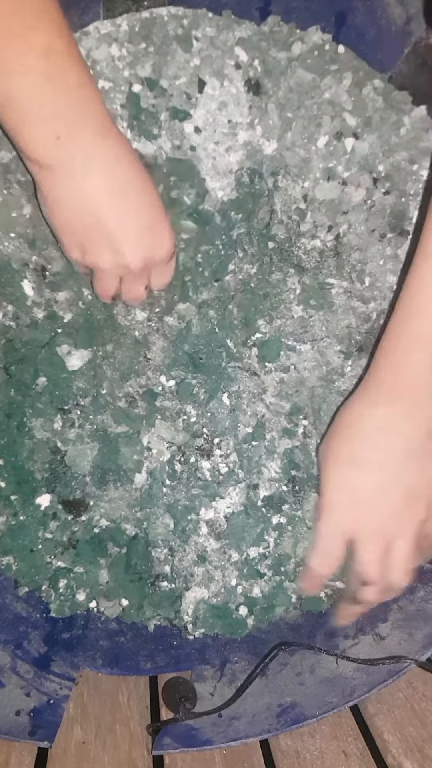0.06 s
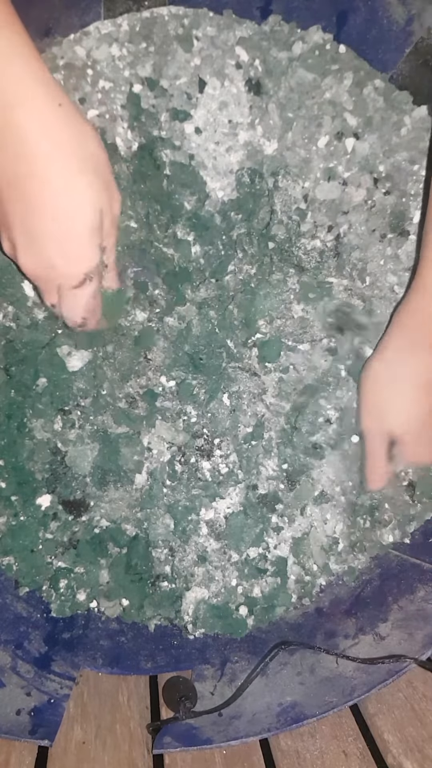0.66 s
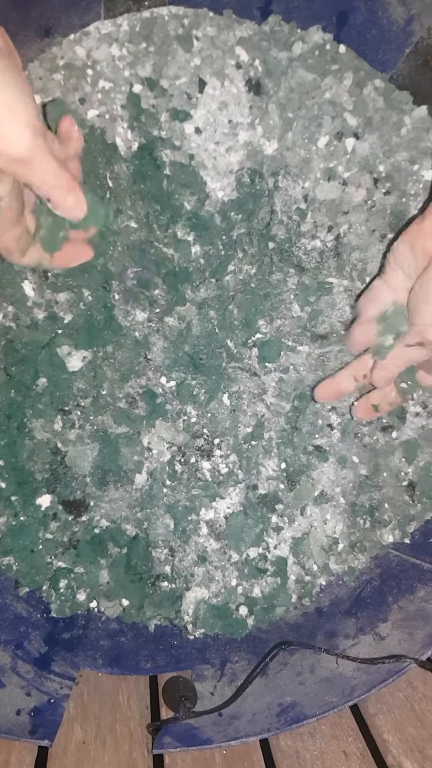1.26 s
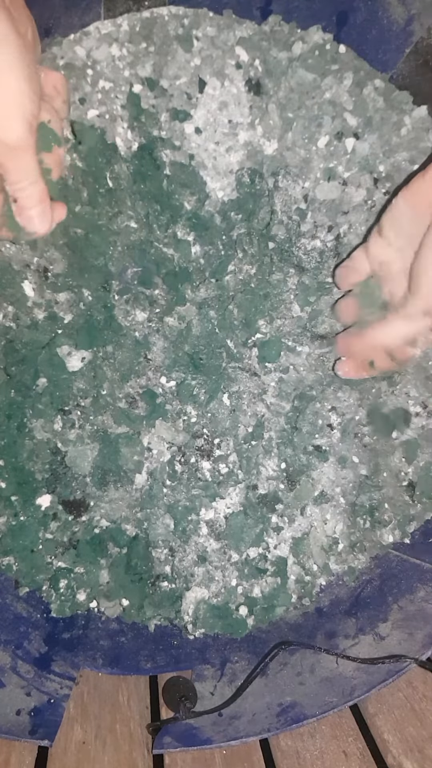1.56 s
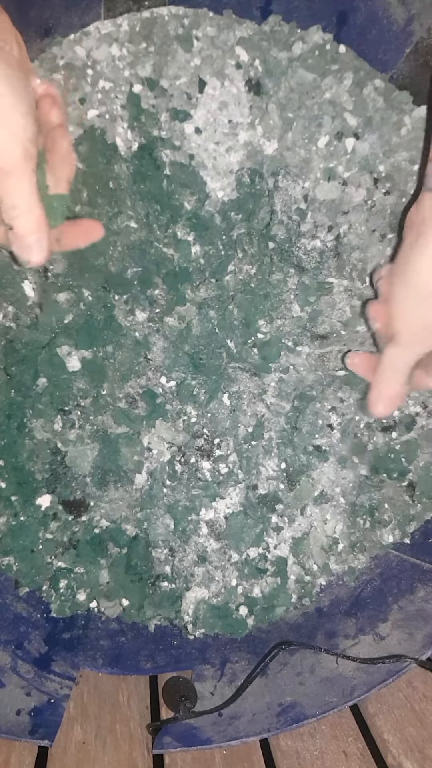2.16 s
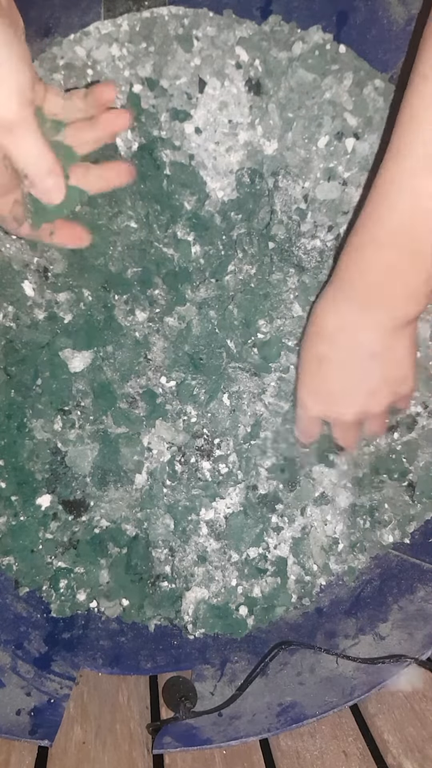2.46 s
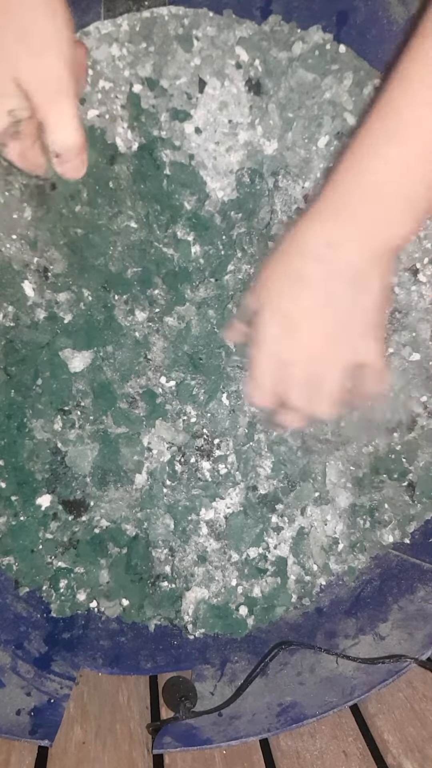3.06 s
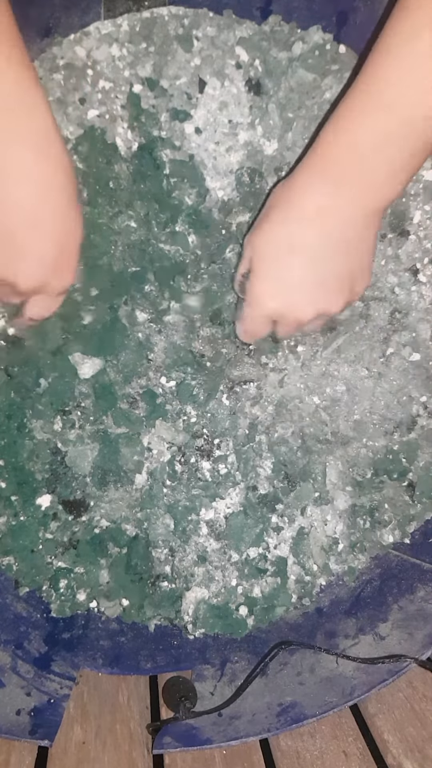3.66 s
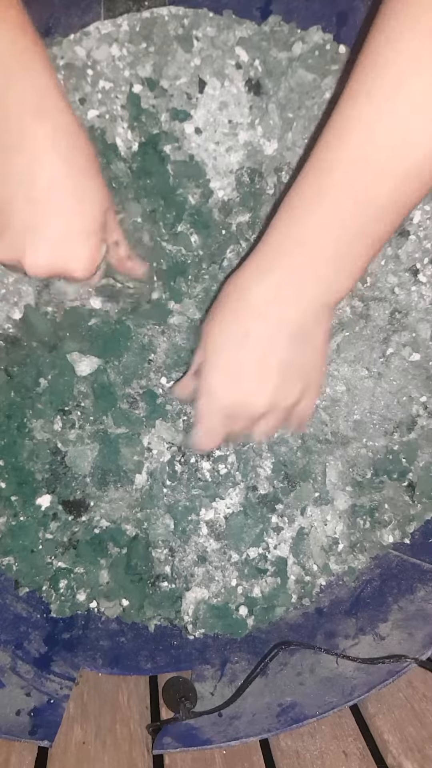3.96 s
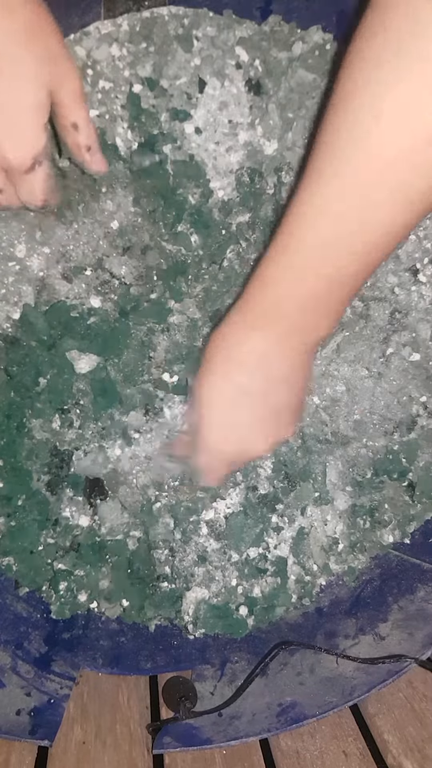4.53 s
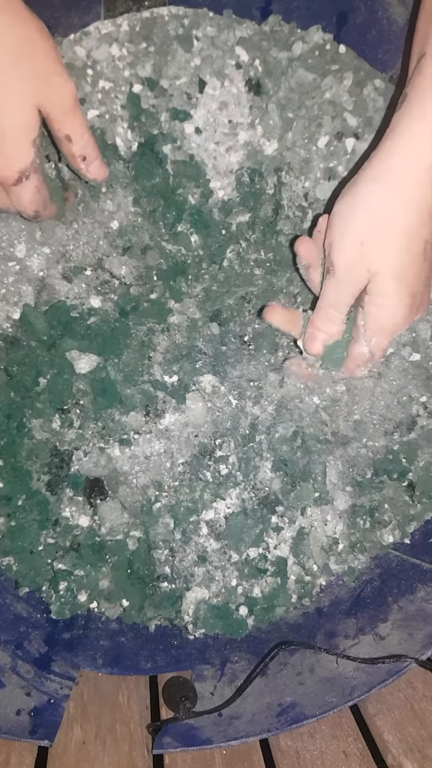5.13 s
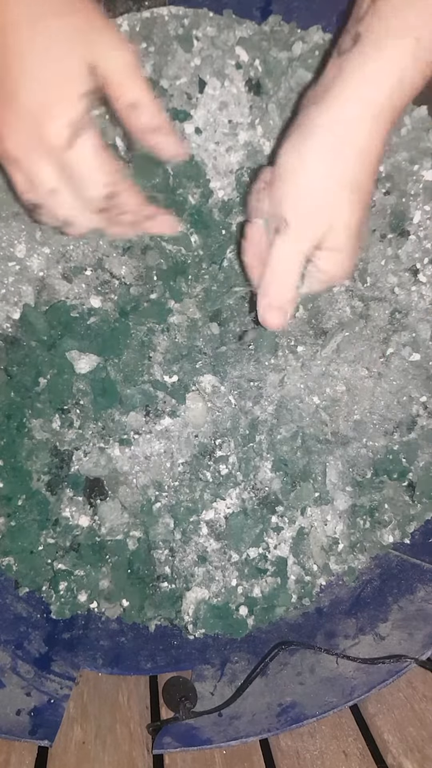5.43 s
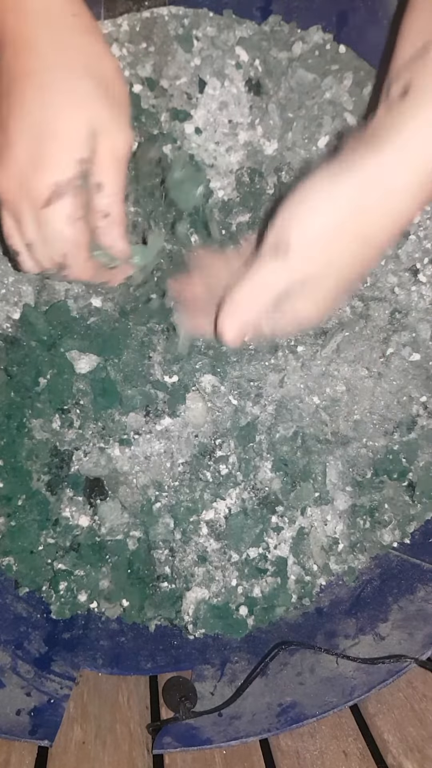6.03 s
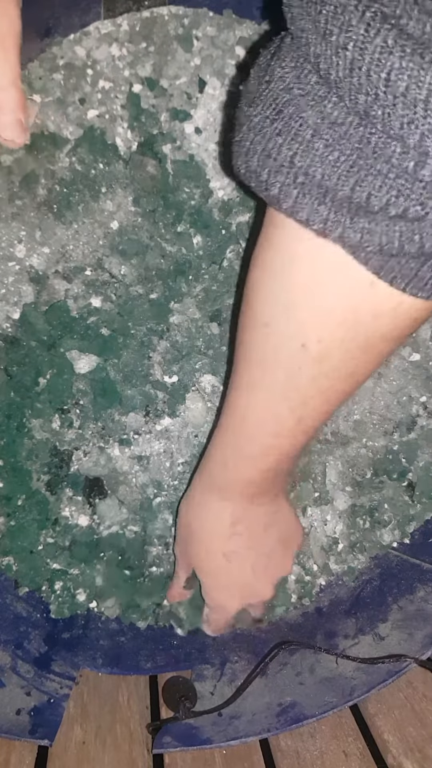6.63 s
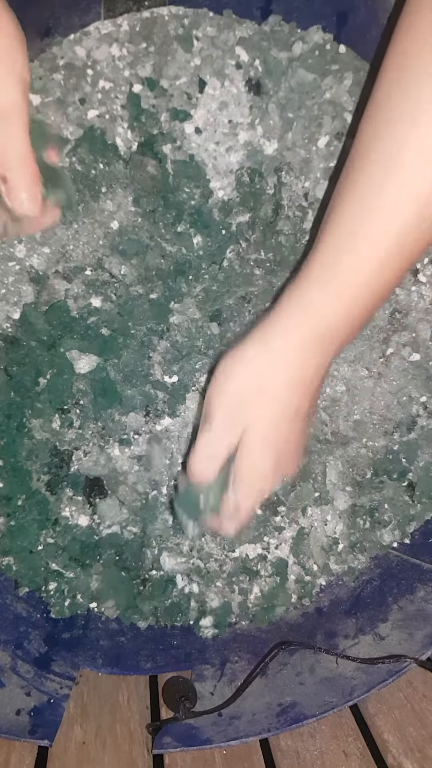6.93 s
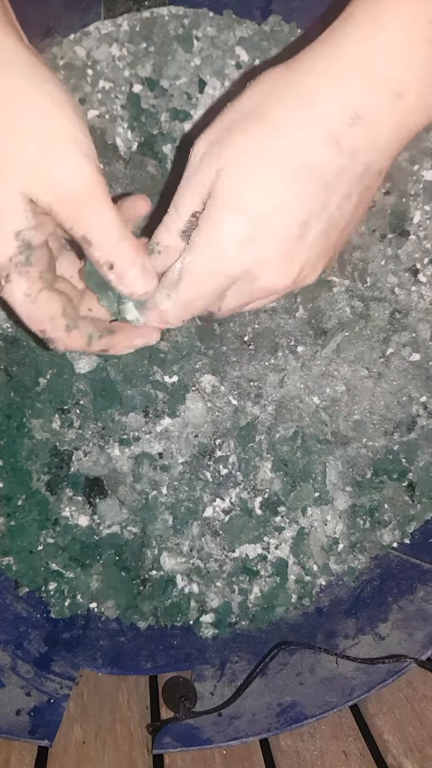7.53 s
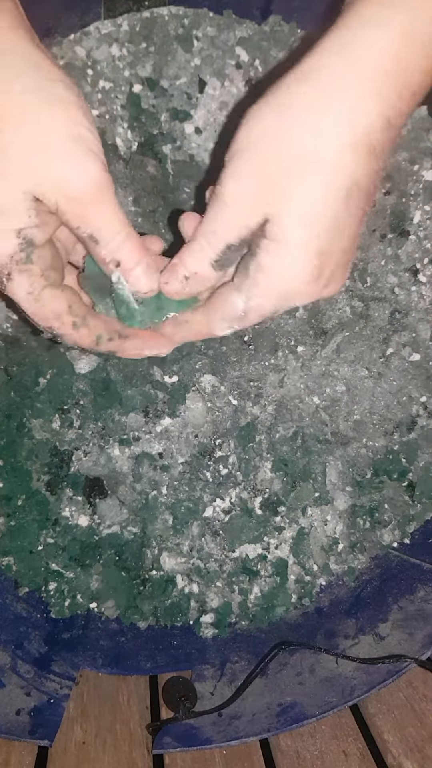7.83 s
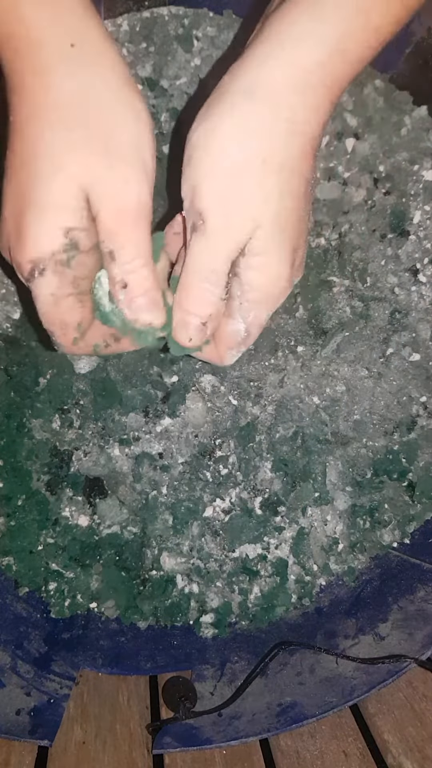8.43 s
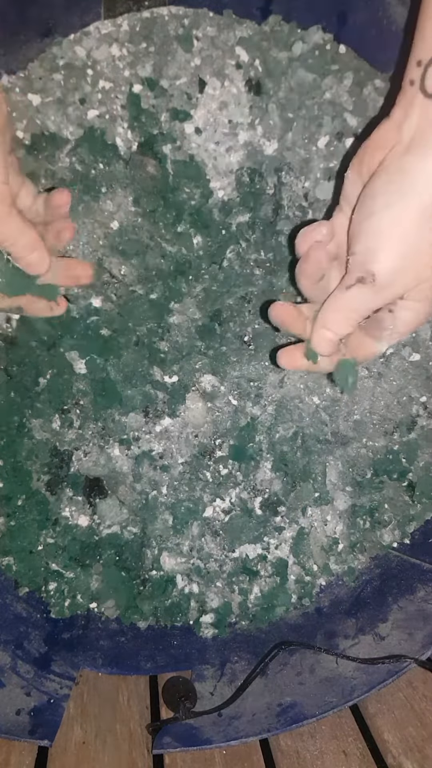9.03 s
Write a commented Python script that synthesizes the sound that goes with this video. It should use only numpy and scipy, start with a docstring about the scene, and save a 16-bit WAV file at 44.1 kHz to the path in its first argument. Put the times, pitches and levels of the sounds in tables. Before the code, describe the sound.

Two hands work crumbled dry foam in a tub, close by, in a quiet room with a faint hush. From about 0.2 to 0.6 seconds comes the loudest part: a cluster of dull knocks and low thuds with grinding rumble and crisp crunches as fingers dig in. Until 2.5 seconds the hands rub handfuls to powder in soft, fine crackling bursts, with a small snap near 1.6. From 2.5 to 4.6 seconds they dig again, making low scraping and a string of lighter knocks. A small knock and crunch come at 5.3 seconds, then a few tiny ticks. At about 6.4 seconds one sharp knock sounds against the tub, followed by brief rumbling, rubbing and a crunchy squeeze near 6.8. From 7 seconds on, faint crumbling continues, with small crumb snaps between 8.2 and 9.3 seconds.

```python
"""A low rumble and dull knocks come first: two hands dig in a tub of crumbled dry foam, close by.
The packed bed grinds as the fingers push in, and lumps give way and knock against the tub.
Crusts crunch, crumbs snap and foam rubs. Between the digs the hands rub
handfuls to powder with a soft, fine crackle. The room around them is quiet."""
import sys
import numpy as np
from scipy import signal
from scipy.fft import rfft, irfft, next_fast_len
from scipy.io import wavfile

SR = 44100
rng = np.random.default_rng(int(sys.argv[2]) if len(sys.argv) > 2 else 0)


def persist_wave(psi):
    """Save psi, clipped to +-1, as 16-bit WAV."""
    counts = np.round(np.clip(psi, -1, 1) * 32767).astype(np.int16)
    wavfile.write(sys.argv[1], SR, np.atleast_2d(counts).T)


N = 409688
TIME = np.arange(N) / SR

# The tone of each noise. Each row: frequency in Hz, strength there in dB.
AIR_TONE = [(25, -11), (50, -10.5), (100, -8), (200, -11), (430, -13.5), (1070, -23.5), (1770, -23.5),
            (5000, -35.5), (8500, -39), (12400, -35.5), (14500, -40)]
RUMBLE_TONE = [(30, -27.5), (60, 0.5), (115, 0.5), (175, 3.5), (280, -4), (420, -8.5), (600, -15),
               (900, -24)]
SCRAPE_TONE = [(300, -27.5), (480, -5), (640, -7.5), (950, -5), (1300, -11), (1900, -18), (3500, -35)]
COARSE_TONE = [(600, -27.5), (1250, -10), (1900, -1.5), (3300, -3), (5000, -10), (9000, -32)]
POWDER_TONE = [(1500, -11.5), (3500, 0), (5500, -1), (8300, 1.5), (10500, -2.5), (12500, -7), (14500, -10)]
SNAP_TONE = [(500, -1), (1000, 8), (1800, 6), (2600, -7), (4500, -30)]
CRUST_TONE = [(400, 1.5), (1200, 3), (2200, 7), (4000, -1), (7000, -11.5), (10000, -16), (14000, -21.5)]
# The room's echo. Each row: frequency in Hz, seconds to fade by 60 dB.
ROOM_FADES = [(100, .3), (330, 0.22), (1000, 0.12), (8000, 0.23)]
# Crumbs snap or land. Each row: start in seconds, level in dB, pitch in Hz, snap in dB above the ring.
CRUMB_TICKS = [(1.588, -44, 484, -4.5), (4.138, -43.5, 726, -9), (5.586, -50.5, 666, 4),
               (5.672, -51.5, 620, 5), (5.738, -52, 450, -6), (8.244, -59, 420, 10), (8.312, -59, 379, -1),
               (8.518, -49, 430, -6), (9.008, -50.5, 520, -8), (9.051, -56.5, 1080, 0),
               (9.275, -44, 400, -24)]
# Foam rubs, or the tub rings on briefly after a knock. Each row: start and length in seconds,
# level in dB, pitch in Hz, width to each side of that pitch in octaves.
RUBS_AND_RINGS = [(0.132, 0.13, -59.5, 890, 0.76), (0.212, 0.014, -35.5, 753, 0.31),
                  (.235, 0.058, -48.5, 1060, 0.77), (0.311, 0.0108, -42, 770, 0.31),
                  (0.457, 0.056, -52.5, 1680, 1.3), (1.058, 0.039, -59.5, 1870, 2.05),
                  (3.544, 0.24, -57.5, 457, 0.98), (4.219, 0.042, -49, 1020, 0.37),
                  (3.828, 0.053, -66, 980, 0.54), (4.248, .06, -63.5, 980, 0.56),
                  (4.472, 0.033, -59.5, 980, 0.78), (4.779, 0.043, -70, 1750, 1.1),
                  (5.356, 0.059, -59.5, 321, 0.23), (6.429, 0.076, -42, 362, 0.54),
                  (6.504, 0.034, -46.5, 1030, 1.06), (6.63, 0.059, -58.5, 944, 0.31),
                  (6.802, .035, -53.5, 3730, 2.1), (7.576, 0.043, -69, 1900, 1.5),
                  (8.548, 0.49, -76, 1643, 1.7)]
# Crusts collapse. Each row: start in seconds, level in dB, fade time in seconds,
# powder spray in dB above the crust (negative means quieter).
CRUST_CRUNCHES = [(0.213, -50, 0.0066, -8), (0.296, -51, 0.0028, 1), (.3695, -36, 0.0017, -6),
                  (0.4005, -34, 0.0019, -9), (0.4593, -38.5, 0.007, -24), (0.494, -40.5, 0.0062, -18),
                  (0.82, -58, 0.008, -3.5), (1.474, -58.5, 0.009, -4), (1.976, -61, 0.0052, 4.5),
                  (2.108, -69, 0.0047, -4), (2.948, -55.5, 0.0089, 2.5), (3.242, -60, 0.0071, -1),
                  (3.307, -45.5, 0.002, -29), (3.663, -57.5, 0.015, 0), (4.278, -60, .003, -15),
                  (5.083, -57, 0.013, -8), (5.343, -46.5, 0.0037, -20), (6.42, -40, 0.0032, -25),
                  (6.577, -56, .004, -10), (8.244, -47, 0.002, -16), (8.311, -61, 0.0043, 1.5),
                  (8.387, -64, 0.014, 0), (9.272, -52.5, 0.0071, -3)]
# Fingers close on a handful. Each row: tightest moment, closing time and opening time in seconds,
# powder level in dB, coarse crumbs in dB above the powder.
HAND_SQUEEZES = [(.1, 0.051, 0.069, -74.5, -2), (.25, 0.078, 0.19, -61.5, -14), (.39, .05, 0.044, -52, 0),
                 (.49, 0.088, 0.051, -58, 2.5), (.66, 0.22, 0.25, -72, 1.5), (.84, 0.14, 0.37, -70, -3.5),
                 (1.07, 0.12, 0.05, -69, 2), (1.31, 0.25, .1, -74, 3), (1.49, 0.18, .14, -66.5, 1.5),
                 (1.83, 0.085, .08, -69.5, 1), (1.98, 0.1, 0.076, -67, -4.5), (2.1, 0.1, 0.14, -65.5, -0.5),
                 (2.56, 0.14, 0.5, -78, 4), (2.95, 0.26, 0.1, -67, -8), (3.26, 0.048, .2, -76, 4),
                 (3.55, .16, 0.17, -75, -7), (3.67, 0.035, 0.055, -66, 0.5), (3.81, 0.027, 0.053, -73.5, 7),
                 (3.96, 0.12, 0.071, -68.5, -0.5), (4.24, 0.054, 0.023, -77.5, 16),
                 (4.38, 0.064, .07, -73.5, 12.5), (4.64, 0.31, 0.27, -70, -0.5),
                 (4.9, 0.033, 0.042, -82, 7), (5.01, 0.034, .04, -77.5, 7.5), (5.09, 0.049, 0.055, -72, 4),
                 (5.36, 0.14, 0.19, -65, -2), (5.81, .06, .06, -76.5, 3.5), (5.96, .08, 0.084, -74.5, -0.5),
                 (6.2, 0.072, 0.12, -72.5, 2), (6.5, .06, 0.38, -65.5, 4), (6.8, 0.15, 0.093, -63.5, -3),
                 (6.822, 0.025, 0.034, -56, 3), (6.91, 0.05, 0.028, -65.5, -4.5),
                 (7.22, 0.13, 0.19, -74, -1), (7.39, 0.19, 0.078, -71, 1), (7.63, 0.11, 0.091, -68.5, -2.5),
                 (7.81, .05, 0.088, -75.5, 2), (8.24, 0.35, 0.18, -72.5, -5), (8.4, .08, 0.11, -69, -3),
                 (8.65, 0.23, 0.15, -70, -2), (9.05, 0.076, 0.31, -74, -2.5), (9.285, .04, .04, -64, -2.5)]
# The bed settles under a palm. Each row: middle in seconds, level in dB, pitch in Hz.
PALM_THUDS = [(0.249, -22.5, 121), (0.272, -25, 100), (.280, -27, 106), (.496, -25.5, 87),
              (2.116, -54, 177), (2.63, -46, 85), (3.306, -38, 81), (3.594, -43.5, 105), (4.446, -33.5, 99),
              (4.524, -40.5, 107), (5.242, -47.5, 119), (6.425, -30, 93), (6.746, -36, 120),
              (7.247, -54.5, 198), (7.295, -50.5, 165), (8.963, -51, 184)]
# A hand pushes into the bed. Each row: start and length in seconds, rumble level in dB,
# finger scrape in dB above the rumble.
HAND_PUSHES = [(0.026, 0.16, -52, -8.5), (0.236, 0.045, -35.5, -14.5), (.31, 0.1, -41, -8),
               (0.492, 0.014, -44, -5), (.56, 0.17, -55, -9.5), (2.493, .03, -63, -5),
               (2.54, 0.027, -48.5, -12), (2.625, 0.094, -56.5, -4), (2.887, .06, -62.5, -12),
               (3.244, .04, -60, -8.5), (3.302, 0.067, -50.5, -10), (3.42, 0.09, -60.5, -15),
               (3.561, 0.16, -57.5, -5.5), (3.72, 0.068, -53.5, -10), (3.815, 0.043, -56.5, -13),
               (3.941, 0.036, -55.5, -12), (4.217, .23, -45.5, -9), (4.495, 0.1, -57.5, -11.5),
               (6.433, 0.09, -41, -7), (6.625, 0.017, -50, -7.5), (6.748, 0.051, -54, -4.5)]
# The filled tub's low, hollow and hard notes. Each row: pitch in Hz, seconds to fade by 60 dB.
TUB_NOTES = [(167, 0.024), (309, 0.024), (920, 0.0115)]
# Lumps give way. Each row: start in seconds, level in dB, hollow and hard notes in dB above the low one,
# pitch multiplier for the low and hollow notes, ring time multiplier.
LUMP_KNOCKS = [(0.2136, 0, -26, -41, 0.44, 0.42), (0.3132, -10, -23.3, -25, 0.19, 0.32),
               (0.3344, -10, -13, -29, 0.42, 1), (0.3833, -2.5, -24, -20, 0.44, 0.2),
               (0.498, 1.5, -40, -20, 0.5, 0.88), (0.7021, -18, -40, -17.5, 1.06, 1.26),
               (0.7646, -31.5, 1, -41, 0.54, 1.3), (2.5404, -23, -3, -8.5, 0.9, 0.99),
               (2.8389, -33, -24.1, -28, 0.59, 1.7), (2.92, -32, -4.5, -28, 0.95, 1.26),
               (3.3077, -19.5, -1, -3.5, 0.96, 0.51), (3.3858, -17.5, -14.5, -14.5, 1.01, 1.43),
               (3.5204, -19, -16.5, -18.5, 0.89, 1.36), (3.8067, -17, -16, -13, 1.05, 1.64),
               (3.9416, -16, -16.5, -13.5, 0.91, 0.94), (4.096, -28, -6.5, -37, 0.86, 1.8),
               (4.2158, -15, -17.5, -7, 1.13, 1.22), (4.3505, -17, -42, -13.5, 1.2, 0.91),
               (4.4495, -12.5, -26, -11, 1.05, 1.4), (5.3449, -14.5, -1.5, -3.5, 0.89, 0.92),
               (6.423, -2, -6.5, -42, 1.045, 0.94), (6.476, -18.5, 1, -9, 1.06, 0.86),
               (6.5482, -21.5, -26, -11.5, 1.17, 1), (6.6195, -14.5, -17.5, -9, 1.13, 1.43),
               (6.957, -37.5, -46, -26, 1.2, 1.5)]


def amp(db):
    """Turns decibels into a multiplier."""
    return 10 ** (np.asarray(db) / 20)


def unit(x):
    """Scales a sound to an average strength (rms) of 1."""
    return x / np.sqrt(np.mean(x ** 2) + 1e-20)


def together(levels):
    """The level of unrelated sounds heard at once: their powers add."""
    return np.sqrt(sum(level ** 2 for level in levels))


def look_up(points, hz):
    """Reads between a table's rows, spacing frequencies by octaves."""
    row_hz, value = np.transpose(points)
    return np.interp(np.log(hz + 1), np.log(row_hz + 1), value)


def add(mix, start_s, sound):
    """Mixes a sound in at a given time."""
    part = mix[max(round(start_s * SR), 0):][:len(sound)]
    part += sound[:len(part)]


def colour(x, tone):
    """Gives a sound a tone that falls away past the table's ends, at strength 1."""
    size = next_fast_len(len(x))
    hz = np.fft.rfftfreq(size, 1 / SR)
    curve = [(tone[0][0] / 2, tone[0][1] - 30), *tone, (tone[-1][0] * 2, tone[-1][1] - 40)]
    spectrum = rfft(x, size) * amp(look_up(curve, hz))
    return unit(irfft(spectrum, size)[:len(x)])


def wander(per_s):
    """A curve that glides between random values, at strength 1."""
    values = rng.standard_normal(N // 16)
    return unit(np.interp(TIME * per_s, np.arange(len(values)), values))


def fractures(per_s, spread_db, clump_db, clumps_per_s):
    """The foam's cell walls break: random clicks, a few of them large, that come in clumps."""
    size = amp(spread_db * np.minimum(rng.exponential(1, N), 4))
    clicks = (rng.random(N) < per_s / SR) * rng.choice([-1, 1], N) * size
    return clicks * amp(clump_db * wander(clumps_per_s))


def room_air(level_db=-69.5):
    """The air in the room makes a faint, steady hush."""
    return amp(level_db) * colour(rng.standard_normal(N), AIR_TONE)


def room_echo(sound, echoes_per_s=3000):
    """The room sends back scattered echoes, each frequency fading at its own speed."""
    echoes = rng.choice([-1., 1.], SR // 2) * (rng.random(SR // 2) < echoes_per_s / SR)
    echoes[:SR // 120] = 0  # the first echo takes a moment to return
    hz, t, bands = signal.stft(echoes, SR, nperseg=256)
    fade = amp(-60 * t / look_up(ROOM_FADES, hz)[:, None])
    tail = signal.istft(bands * fade, SR, nperseg=256)[1]
    return signal.oaconvolve(sound, tail / np.linalg.norm(tail))[:N]


def crumb_ticks(ring_s=0.015, snap_s=0.0091):
    """A crumb snaps: a brief ring under a dry, splintering click."""
    out, t = np.zeros(N), np.arange(SR // 25) / SR
    for start, db, hz, snap_db in CRUMB_TICKS:
        ring = amp(-60 * t / ring_s) * np.sin(2 * np.pi * hz * t)
        snap = amp(snap_db - 60 * t / snap_s) * colour(rng.standard_normal(len(t)), SNAP_TONE)
        add(out, start, amp(db) * (ring + snap))
    return out


def rubs_and_rings(edge_db=-24):
    """Foam sticks and slips, or the tub rings on after a knock: a rough band of noise around one pitch."""
    out = np.zeros(N)
    for start, length, db, hz, octaves in RUBS_AND_RINGS:
        band = [(hz / 2 ** octaves, edge_db), (hz, 0), (hz * 2 ** octaves, edge_db)]
        noise = colour(rng.standard_normal(SR), band)[:round(length * SR)]
        soft_ends = signal.windows.tukey(len(noise), .5)
        add(out, start, amp(db) * unit(noise * soft_ends))
    return out


def crust_crunches(rise_s=0.00084):
    """A crust caves in: a sudden rush of bright cracks that dies away, with a spray of powder."""
    crust_level, spray_level, t = np.zeros(N), np.zeros(N), np.arange(SR // 10) / SR
    for start, db, fade_s, spray_db in CRUST_CRUNCHES:
        burst = amp(db) * (1 - np.exp(-t / rise_s)) * np.exp(-t / fade_s)
        add(crust_level, start, burst)
        add(spray_level, start, amp(spray_db) * burst)
    crust = colour(fractures(per_s=6400, spread_db=3, clump_db=2, clumps_per_s=220), CRUST_TONE)
    spray = colour(fractures(per_s=9000, spread_db=3, clump_db=-0.5, clumps_per_s=220), POWDER_TONE)
    return crust_level * crust + spray_level * spray


def squeeze_levels(swell_db=12.5, roundness=1.17, tremor_db=1.0):
    """Powder and coarse crumbs grow louder as the fingers close and fade as they open."""
    t, powder, coarse = TIME[::32], [], []
    for tightest, closing, opening, db, coarse_db in HAND_SQUEEZES:
        slack = np.maximum((tightest - t) / closing, (t - tightest) / opening)
        level = amp(db - swell_db * slack ** roundness)
        powder.append(level)
        coarse.append(level * amp(coarse_db))
    tremor = amp(tremor_db * wander(per_s=16))  # the fingers stick and slip as they press
    return tremor * np.interp(TIME, t, together(powder)), tremor * np.interp(TIME, t, together(coarse))


def crumbling(scrape_level):
    """Fine powder fizzes and coarse crumbs crackle as the hands break them."""
    powder_squeeze, coarse_squeeze = squeeze_levels()
    # three parts: squeezing, scraping through the bed, and loose crumbs that never quite come to rest
    powder_level = together([powder_squeeze, amp(-22.5) * scrape_level, amp(-82.5)])
    coarse_level = together([coarse_squeeze, amp(-12) * scrape_level, amp(-85.5)])
    powder = colour(fractures(per_s=16000, spread_db=2.5, clump_db=1.5, clumps_per_s=310), POWDER_TONE)
    coarse = colour(fractures(per_s=5000, spread_db=2.5, clump_db=2, clumps_per_s=140), COARSE_TONE)
    return powder_level * powder + coarse_level * coarse


def palm_thuds(width_cycles=0.38):
    """The bed sinks and springs back: a short, low wobble with no sharp edge."""
    out, t = np.zeros(N), np.arange(-SR // 25, SR // 25) / SR
    for middle, db, hz in PALM_THUDS:
        swell = np.exp(-.5 * (hz * t / width_cycles) ** 2)
        add(out, middle + t[0], -amp(db) * swell * np.cos(2 * np.pi * hz * t))
    return out


def push_levels(bite_db_per_s=698.5, sag_db_per_s=14, settle_db_per_s=200):
    """Rumble and scrape rise fast, sag as the bed yields and die away when the hand stops."""
    t, rumble, scrape = TIME[::32], [], []
    for start, length, db, scrape_db in HAND_PUSHES:
        bite = bite_db_per_s * np.maximum(start - t, 0)
        sag = sag_db_per_s * np.clip(t - start, 0, length)
        settle = settle_db_per_s * np.maximum(t - start - length, 0)
        level = amp(db - bite - sag - settle)
        rumble.append(level)
        scrape.append(level * amp(scrape_db))
    return np.interp(TIME, t, together(rumble)), np.interp(TIME, t, together(scrape))


def digging(rumble_level, scrape_level):
    """The packed bed slips in small jerks under the fingers: a low rumble and a higher scrape."""
    rumble = colour(fractures(per_s=1300, spread_db=1.45, clump_db=3, clumps_per_s=98), RUMBLE_TONE)
    scrape = colour(fractures(per_s=2500, spread_db=1.5, clump_db=2.5, clumps_per_s=110), SCRAPE_TONE)
    return rumble_level * rumble + scrape_level * scrape


def lump_knocks(treble_cut_hz=1535, bass_cut_hz=250):
    """A lump gives way and kicks the tub, whose three notes die out quickly."""
    out, t = np.zeros(N), np.arange(SR // 8) / SR
    for start, db, hollow_db, hard_db, pitch, length in LUMP_KNOCKS:
        shares = amp([0, hollow_db, hard_db])
        bends = [pitch, pitch, 1]  # the hand's weight shifts the two lower notes
        ring = sum(share * amp(-60 * t / (fade_s * length)) * np.sin(2 * np.pi * hz * bend * t)
                   for (hz, fade_s), share, bend in zip(TUB_NOTES, shares, bends))
        add(out, start, amp(db) * ring)
    # soft foam blunts the blow, and the knocks carry little bass
    blunted = signal.sosfilt(signal.butter(3, treble_cut_hz, fs=SR, output="sos"), out)
    return signal.sosfilt(signal.butter(2, bass_cut_hz, "high", fs=SR, output="sos"), blunted)


def scene(bass_cut_hz=42, echo_db=-20.5):
    """The hands and the tub up close, with a faint echo and steady air, in one channel."""
    rumble_level, scrape_level = push_levels()
    bed = palm_thuds() + digging(rumble_level, scrape_level)
    bass_cut = signal.butter(2, bass_cut_hz, "high", fs=SR, output="sos")
    bed = signal.sosfiltfilt(bass_cut, bed)  # the recorder cuts the deepest bass from rumble and thuds
    hands = lump_knocks() + bed + rubs_and_rings()
    hands += crumb_ticks() + crumbling(scrape_level) + crust_crunches()
    return (room_air() + hands + amp(echo_db) * room_echo(hands))[None]


def record(dry):
    """Cuts away the treble above 14650 Hz."""
    treble_cut = signal.firwin(511, 14650, window=("kaiser", 9), fs=SR)
    return signal.oaconvolve(dry, treble_cut[None], "same")


dry = scene()
out = record(dry)
persist_wave(out)
```